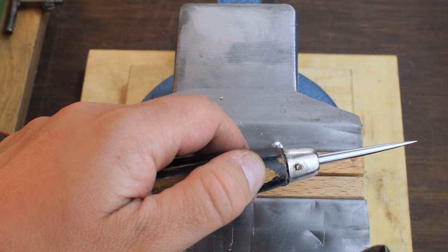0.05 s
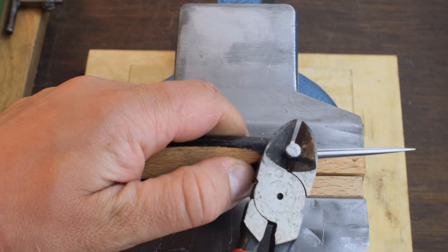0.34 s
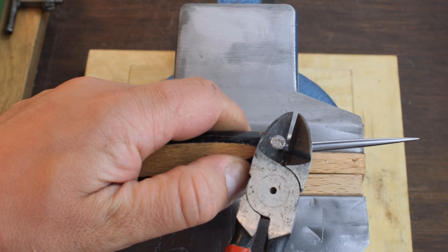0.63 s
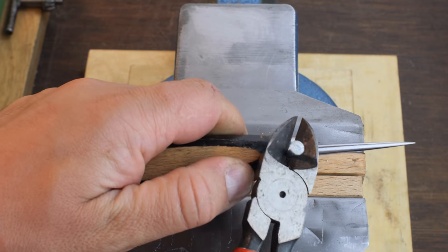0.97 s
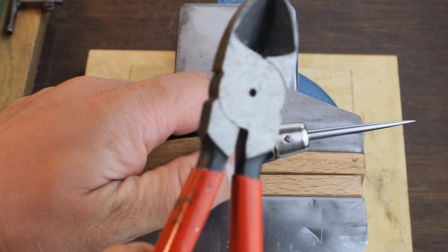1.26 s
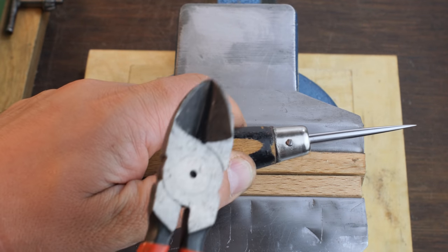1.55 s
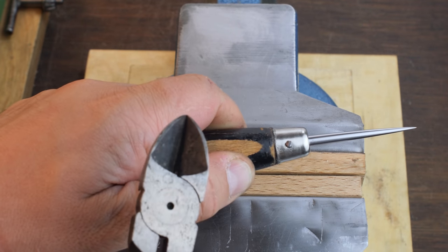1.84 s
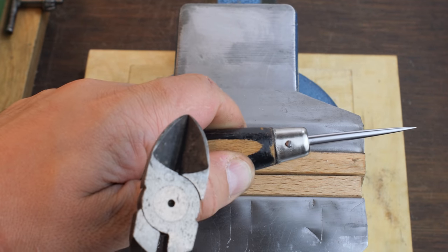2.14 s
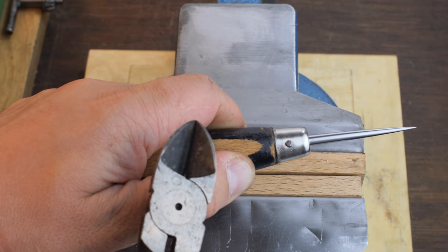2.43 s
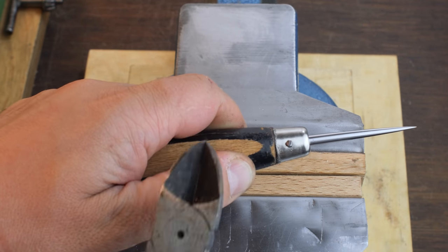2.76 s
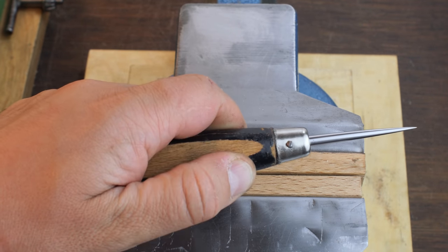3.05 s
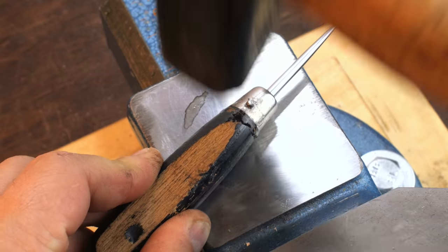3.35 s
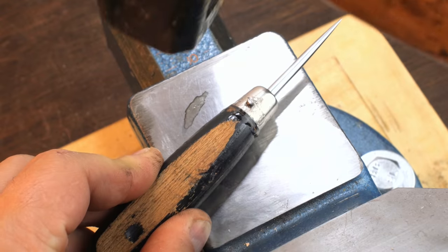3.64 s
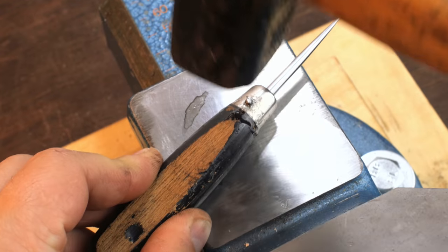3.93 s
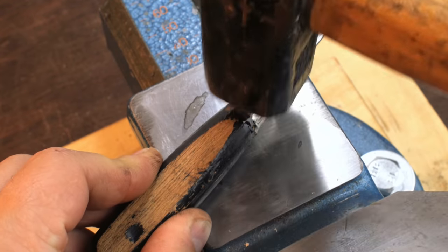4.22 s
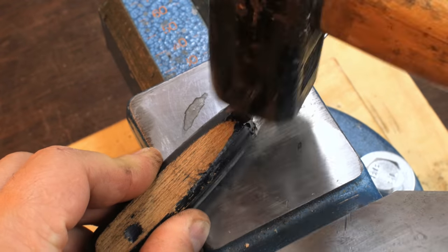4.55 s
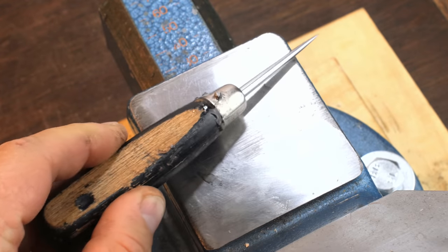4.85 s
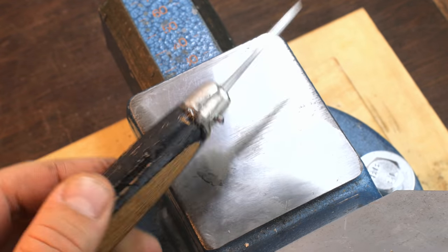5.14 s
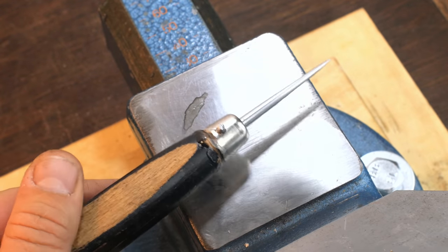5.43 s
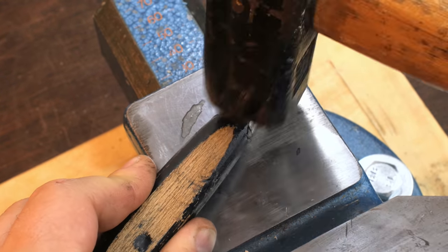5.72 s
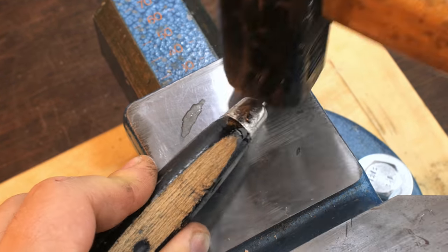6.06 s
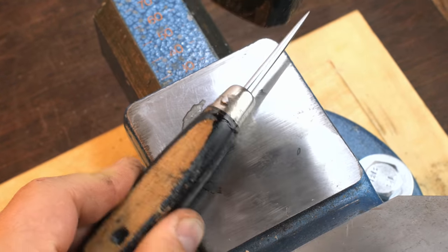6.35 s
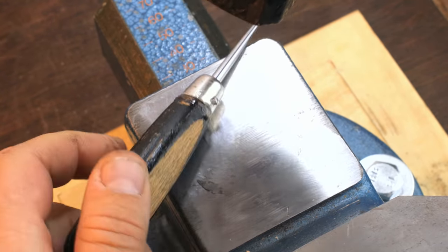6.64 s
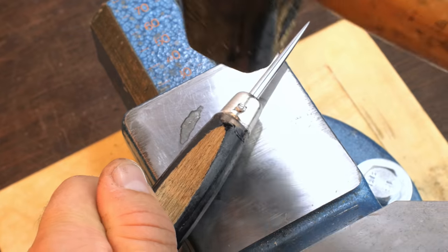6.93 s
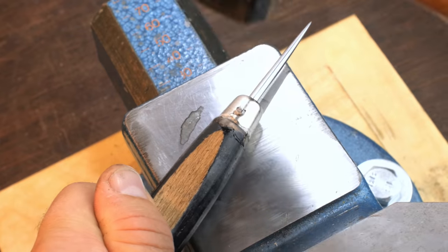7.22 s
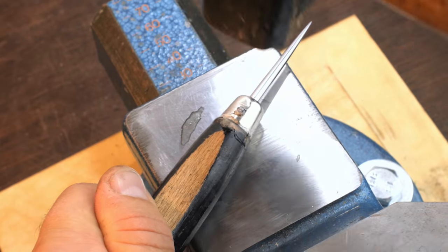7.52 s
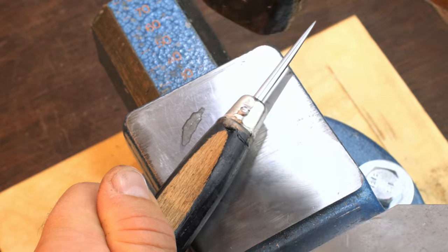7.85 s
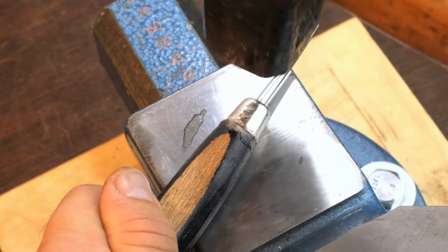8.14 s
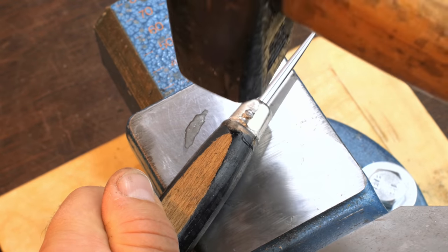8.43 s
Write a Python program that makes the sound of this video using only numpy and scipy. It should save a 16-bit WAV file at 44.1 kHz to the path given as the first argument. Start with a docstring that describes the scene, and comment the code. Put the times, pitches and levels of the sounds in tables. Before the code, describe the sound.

Cutters snip a metal pin, the scrap bounces away, then a hammer taps steel on a vise in short runs with pauses.

```python
"""A hammer peens a steel pin in an awl's ferrule on the anvil of a bench vise, heard from close by.
At each blow the steel ticks, the handle knocks, the bench thuds; loose vise parts chatter after most.
First, side cutters snip the pin and the off-cut lands across the workshop. Between runs of blows the
awl is turned over and clinks on the anvil, and low rumble swells. The stereo microphone pair is on a
camera at the bench: its stand sways with the blows and its limiter holds them down."""
import sys
import numpy as np
from scipy import signal
from scipy.fft import rfft, irfft
from scipy.io import wavfile
from scipy.ndimage import uniform_filter1d, minimum_filter1d

SR = 44100
rng = np.random.default_rng(int(sys.argv[2]) if len(sys.argv) > 2 else 0)


def int16_out(signal):
    """Quantize to a 16-bit WAV file."""
    q = np.round(np.clip(np.atleast_2d(signal).T, -1, 1) * 32767)
    wavfile.write(sys.argv[1], SR, q.astype(np.int16))


N = 378378
T = np.arange(2 * SR // 5) / SR  # time axis of one hit
OFFCUT_HZ = 15050

# still workshop air: (frequency [Hz], level [dB])
AIR_COLOUR = [(12, -38.5), (20, 5.5), (55, -7.5), (98, -4), (168, -5.5), (248, -3), (399, -15.5),
              (434, -13), (499, -19), (558, -19), (897, -23.5), (1260, -24), (5230, -33), (14700, -35.5),
              (16000, -38.5)]
# tool and handle knock in the fingers: (time [s], level [dB], pitch [Hz])
HANDLING_KNOCKS = [(0.988, -61, 2300), (1.1936, -43, 1550), (1.2072, -42, 1380), (1.335, -56.5, 664),
                   (1.578, -58, 2764), (4.771, -62, 1837), (4.837, -63, 1414), (6.46, -63, 760),
                   (6.511, -53.5, 1320), (6.544, -50, 790), (6.71, -42.5, 2370), (6.817, -54, 1440)]
# modes of a held tool: (multiple of the pitch, level [dB], t60 [s])
HELD_MODES = [(1, 2.5, .02), (1.37, -6, 0.011), (1.9, -6, 0.0099)]
# tiny contacts of loose parts: (frequency [Hz], level [dB])
RATTLE_COLOUR = [(500, -16.5), (1900, -9), (2400, 8), (3000, -3), (3600, -5), (4200, -12), (5500, -7.5),
                 (7000, -12.5), (11000, -20.5), (14000, -36)]
# the cutters bite, snap through and settle: (time [s], level [dB])
SNIP_HITS = [(1.1156, -56), (1.1195, -25.5), (1.1213, -50), (1.2058, -50), (1.388, -71.5), (1.422, -66)]
# the pin breaking: (frequency [Hz], level [dB])
SNAP_COLOUR = [(300, -19), (850, -22), (1400, -2), (3000, -4.5), (4000, -3.5), (4900, 4), (6100, -3.5),
               (6900, -8), (12500, -11), (14000, -14.5), (15200, -18), (16000, -22.5)]
# cutter jaws: (frequency [Hz], level [dB], t60 [s])
JAW_MODES = [(1486, -14.5, 0.0087), (2344, -2, 0.021), (2840, -15.5, 0.034), (3500, -7.5, 0.019),
             (4650, 0, 0.02), (5280, -15, 0.024), (5860, -4, 0.027), (7560, -11.5, 0.023),
             (9170, -11.5, 0.0098), (10600, -22, 0.015), (12000, -13.5, 0.013)]
# low rumble swells between the blows: (time [s], level [dB])
RUMBLE_SWELLS = [(1.18, -42.5), (4.851, -41), (5.522, -35.5), (6.35, -40)]
# the stand under the microphones: (frequency [Hz], level [dB])
STAND_MODES = [(24, -12.5), (30.5, 3.5), (55, -19), (79, -12)]
# the hand or the rocking vise jolts the bench: (time [s], level [dB], cutoff [Hz])
BENCH_JOLTS = [(1.1936, -33, 252), (1.2016, -28, 89), (1.207, -35.5, 400), (1.328, -41.5, 91),
               (1.363, -46.5, 47.7), (1.404, -60.5, 50.6), (1.505, -45, 66), (4.82, -50.5, 444),
               (5.593, -53, 397), (7.151, -32.5, 588), (7.185, -21, 203)]
# jolted bench top: (frequency [Hz], level [dB])
JOLT_COLOUR = [(20, -6.5), (50, 4.5), (120, 9.5), (200, -4), (310, 2.5), (500, -7), (1000, -2.5),
               (4000, -10)]
# vise on its board and bench: (frequency [Hz], level [dB], t60 [s])
BENCH_MODES = [(62.2, -25.5, 0.53), (84, -18.5, .14), (129.3, -7, 0.1), (161.3, -18.5, .42),
               (200, -16, 0.041), (224.7, -18.5, 0.087), (290, -7, 0.04), (301.3, -2.5, 0.055),
               (344, -7, 0.08), (405, -10, 0.1), (436, -10, 0.076), (516, -5.5, 0.042), (612, -8, 0.032),
               (687, -7.5, 0.05)]
# the off-cut bounces across the room: (time [s], level [dB], ring pitch [Hz], ring level [dB])
BOUNCES = [(1.677, -50.5, 690, -54.5), (1.689, -63, 946, -50), (1.9274, -23.5, 870, -43),
           (1.9387, -46.5, 1204, -34), (2.009, -47.5, 1130, -64), (2.085, -46, 1260, -59)]
# clack of its landing: (frequency [Hz], level [dB])
BOUNCE_COLOUR = [(100, -24), (380, -5), (680, -20.5), (880, 0.5), (1400, -5), (2300, -4), (5200, -8.5),
                 (7000, -11), (9500, -14.5), (12500, -22.5), (14200, -30), (15100, -31), (16000, -24.5)]
# fingers slide along the handle: (fastest moment [s], length [s], level [dB])
FINGER_SLIDES = [(3.33, 0.066, -66), (3.43, 0.11, -66.5), (3.86, 0.087, -66), (4.26, 0.035, -65),
                 (4.94, 0.11, -67.5), (5.14, 0.11, -59.5), (5.25, 0.36, -72), (6.62, 0.16, -78.5),
                 (7.04, 0.3, -55), (7.38, 0.19, -61.5), (8.4, 0.3, -75)]
# skin on wood: (frequency [Hz], level [dB])
SKIN_COLOUR = [(200, -12), (500, 2), (1500, -1.5), (3000, -6), (6000, -6), (10000, -4), (14000, -19.5),
               (16000, -16)]
# hammer blows: (time [s], tick [dB], tick pitch [Hz], crack [dB], knock [dB], thud [dB], sway [dB])
HAMMER_BLOWS = [(3.4905, -32, 5350, -35.5, -40.5, -36, -33), (3.9086, -31, 5170, -34.5, -38.5, -35, -32),
                (4.2812, -29.5, 5420, -33.5, -38.5, -34.5, -30),
                (4.634, -33.5, 5210, -37.5, -41.5, -39.5, -35), (5.8087, -30, 5270, -30, -40, -37, -29),
                (6.1144, -28, 4960, -36, -45.5, -44, -31), (6.873, -53.5, 5340, -19.5, -26.5, -23, -21),
                (7.1478, -34, 5130, -32.5, -32.5, -24, -15.5),
                (7.4593, -30, 5020, -34.5, -42.5, -36, -31.5), (7.758, -30.5, 5190, -35, -38.5, -34, -31.5),
                (8.0452, -52.5, 4940, -29, -35.5, -31, -28.5)]
# ferrule and pin: (multiple of the tick pitch, level [dB], t60 [s])
FERRULE_MODES = [(1, 9.5, 0.0052), (1.08, -29.5, 0.018), (1.73, 2, 0.0028), (2.06, 5, .003),
                 (2.32, -15.5, .003)]
# crack of steel on steel: (frequency [Hz], level [dB])
CRACK_COLOUR = [(300, -26), (1400, 4.5), (2400, -3), (3800, -0.5), (5800, -9), (7300, -7.5), (11500, -6.5),
                (13000, -14), (16000, -26.5)]
# loose steel of the vise: (frequency [Hz], level [dB], t60 [s])
VISE_MODES = [(2325, 0, .08), (2420, -2, .07), (2600, -5, .05), (2762, -3, .07), (2900, -5, .06),
              (3210, -7, .04), (3375, -7, .06), (3522, -1, .11), (4258, -9, .05), (4743, -6, .07),
              (5572, -11, .08)]
# wooden handle and hammer head: (frequency [Hz], level [dB], t60 [s])
HANDLE_MODES = [(770, -6, .014), (864, -3, .016), (1130, -9, .012), (1270, 0, .014), (1526, -3, .013),
                (1755, -9, .014)]
# dull boom of the bench top under a blow: (frequency [Hz], level [dB])
BOOM_COLOUR = [(40, -11.5), (80, -4), (140, -1), (220, -11), (300, 4.5), (370, -9.5), (600, -10),
               (1200, -26), (4000, -45.5)]
# loose vise parts fall back: (time [s], level [dB])
VISE_FALLS = [(3.513, -41), (3.962, -47.5), (4.304, -44.5), (4.689, -50.5), (5.861, -44), (6.915, -25),
              (7.182, -27), (7.212, -37.5), (7.792, -46), (8.089, -35.5)]
# the awl touches the anvil: (time [s], level [dB])
AWL_TOUCHES = [(5.594, -64.5), (6.511, -69), (6.543, -67), (6.653, -45), (6.66, -47.5), (6.671, -51),
               (6.682, -44.5), (6.699, -47.5), (6.709, -43), (6.819, -48.5), (6.833, -38), (6.838, -45.5)]
# the awl's ferrule and spike: (frequency [Hz], level [dB], t60 [s])
AWL_MODES = [(1400, -22.5, .03), (2440, -23, 0.046), (4740, -11.5, 0.029), (5360, 0, 0.0072),
             (5750, -2.5, 0.032), (5800, -18.5, .12), (7040, -13, .02), (8040, -7, .02), (8700, -3.5, .03),
             (11900, -14.5, .02), (12700, -10, 0.02)]
# ferrule scraping the anvil: (frequency [Hz], level [dB])
SCRAPE_COLOUR = [(500, -7), (2300, -9.5), (3700, -9), (4800, 2.5), (5700, 13), (6500, -16.5), (8400, 0),
                 (9500, -11.5), (13000, -21.5), (16000, -25)]
# decay of the workshop: (frequency [Hz], t60 [s])
WORKSHOP_T60 = [(80, 1), (200, 0.29), (500, .32), (1500, 0.26), (5000, 0.27), (10000, 0.24), (16000, 0.28)]
# its reflections at the microphones: (frequency [Hz], level [dB])
WORKSHOP_COLOUR = [(60, -1), (200, -1), (500, -5.5), (1200, -5.5), (2800, -8), (5000, -8), (8000, -7),
                   (11500, -12), (15000, -17.5)]


def amp(db):
    """Decibels to gain."""
    return 10 ** (np.asarray(db) / 20)


def read(points, hz):
    """A curve's value, joined on a log-frequency axis."""
    f, value = np.transpose(points)
    return np.interp(np.log(hz + 1), np.log(f), value)


def unit(x):
    """Scales a hit to the energy of 20 ms at level 1."""
    return x * np.sqrt(SR / 50 / np.sum(x ** 2))


def add(mix, s, sound):
    """Mixes a sound in at time s."""
    part = mix[round(s * SR):][:len(sound)]
    part += sound[:len(part)]


def tint(x, colour):
    """Filters a sound by the given spectrum."""
    size = x.shape[-1]
    return irfft(rfft(x) * amp(read(colour, np.fft.rfftfreq(size, 1 / SR))), size)


def noise(colour, size):
    """Steady noise of level 1 with the given spectrum."""
    x = tint(rng.standard_normal(size), colour)
    return x / x.std()


def burst(colour, t60):
    """Countless dense modes dying together."""
    return unit(noise(colour, len(T)) * amp(-60 * T / t60))


def ring(modes, scale=1, vary_db=0):
    """Decaying modes of alternate sign; the spot that is struck shifts their balance."""
    shifts = vary_db * rng.standard_normal(len(modes))
    return unit(sum((-1) ** k * amp(db + shifts[k] - 60 * T / t60) * np.sin(2 * np.pi * hz * scale * T)
                    for k, (hz, db, t60) in enumerate(modes)))


def pair(mid, side, side_db):
    """Left and right of a closely spaced microphone pair."""
    side = amp(side_db) * side
    return np.array([mid + side, mid - side]) / np.sqrt(1 + amp(side_db) ** 2)


def air(level_db):
    """The low, steady hush of the workshop, all around the microphones."""
    return amp(level_db) * pair(noise(AIR_COLOUR, N), noise(AIR_COLOUR, N), side_db=-2)


def handling(knock_db, click_db):
    """Light knocks of tool and handle, damped at once by the fingers."""
    out = np.zeros(N)
    attack = 1 - np.exp(-T / 0.002)
    for s, db, hz in HANDLING_KNOCKS:
        tone = ring(HELD_MODES, hz, vary_db=3)
        click = amp(click_db) * burst(RATTLE_COLOUR, t60=0.01)
        add(out, s, amp(db + knock_db) * (tone + click) * attack)
    return out


def cutters(snip_db, ring_db, zing_db):
    """The pin breaks with a dense crack, the jaws ring briefly and the freed scrap zings."""
    out = np.zeros(N)
    jaws = amp(ring_db) * ring(JAW_MODES)
    for s, db in SNIP_HITS:
        zing = ring([(OFFCUT_HZ * rng.uniform(.96, 1.03), 0, .16) for _ in range(6)])
        snap = burst(SNAP_COLOUR, t60=.014)
        add(out, s, amp(db + snip_db) * (snap + jaws + amp(zing_db) * zing))
    return out


def rumble(sway_db, right_db, lift_db, sway_s):
    """Each blow sways the stand, and low rumble also swells between blows; left and right mostly oppose."""
    t = np.arange(0, sway_s, 1 / SR)
    swell = np.sin(np.pi * t / sway_s)
    rock, lift = np.zeros((2, N))
    for s, *_, db in HAMMER_BLOWS + RUMBLE_SWELLS:
        for motion in (rock, lift):
            modes = sum(amp(level) * np.sin(2 * np.pi * (hz * rng.uniform(.92, 1.08) * t + rng.random()))
                        for hz, level in STAND_MODES)
            add(motion, s, amp(db + sway_db) * swell * modes)
    return np.array([rock, -amp(right_db) * rock]) + amp(lift_db) * lift


def jolts(bump_db, ring_db):
    """A push rings the bench top; the softer the contact, the less it holds above the bass."""
    out = np.zeros(N)
    for s, db, cutoff_hz in BENCH_JOLTS:
        boom = burst(JOLT_COLOUR, t60=0.12) + amp(ring_db) * ring(BENCH_MODES)
        push = signal.lfilter(*signal.butter(2, cutoff_hz, fs=SR), boom)
        add(out, s, amp(db + bump_db) * unit(push))
    return out


def offcut(zing_db):
    """Across the room the scrap clacks on a hard surface that rings briefly, and itself zings high."""
    out = np.zeros(N)
    for s, db, hz, ring_db in BOUNCES:
        clack = amp(db) * burst(BOUNCE_COLOUR, t60=0.12)
        surface = amp(ring_db) * ring([(hz, 0, .05), (hz * 1.3, -3, .04)])
        zing = ring([(OFFCUT_HZ * rng.uniform(.98, 1.02), 0, .2) for _ in range(6)])
        add(out, s, clack + surface + amp(zing_db + 0.12 * db) * zing)
    return out


def fingers(rub_db, side_db, rise_share):
    """Skin hisses on wood, swelling as each slide speeds up and fading as it slows."""
    t = np.arange(N) / SR
    power = np.zeros(N)
    for s, length, db in FINGER_SLIDES:
        width = length * np.where(t < s, rise_share, 1 - rise_share)
        power += amp(db) ** 2 * np.exp(-((t - s) / width) ** 2)
    return amp(rub_db) * np.sqrt(power) * pair(noise(SKIN_COLOUR, N), noise(SKIN_COLOUR, N), side_db)


def ferrule(tick_db):
    """Steel meets steel: a short, bright tick, spread by a second touch as the ferrule meets the anvil."""
    out = np.zeros(N)
    for s, tick, hz, *_ in HAMMER_BLOWS:
        add(out, s, amp(tick + tick_db) * ring(FERRULE_MODES, hz, vary_db=3))
        add(out, s + 0.00062, amp(tick + tick_db - 17) * burst(CRACK_COLOUR, t60=0.019))
    return out


def hammer(crack_db, knock_db, thud_db, boom_db, vise_db):
    """Each blow cracks and rings handle, vise and bench; the handle's pitch shifts with the grip."""
    out = np.zeros(N)
    for s, _, _, crack, knock, thud, _ in HAMMER_BLOWS:
        steel = ring(VISE_MODES, vary_db=2.5)
        wood = ring(HANDLE_MODES, rng.uniform(.93, 1.07), vary_db=2)
        add(out, s, amp(crack + crack_db) * burst(CRACK_COLOUR, t60=0.048))
        add(out, s, amp(crack + vise_db) * steel)
        add(out, s, amp(knock + knock_db) * wood)
        add(out, s, amp(thud + boom_db) * burst(BOOM_COLOUR, t60=0.14))
        bench = ring(BENCH_MODES, rng.uniform(.97, 1.03), vary_db=2)
        add(out, s + 0.00049, amp(thud + thud_db) * bench)
    return out


def chatter(rattle_db, ring_db):
    """Loose steel falls back in a flurry of tiny contacts, each of which detunes its ring a little."""
    out = np.zeros(N)
    for s, db in VISE_FALLS:
        flurry = unit(burst(RATTLE_COLOUR, t60=0.031) * (1 - np.exp(-T / .008)))
        add(out, s - .005, amp(db + rattle_db) * flurry)
        for delay in (0, .004, .009):
            steel = ring(VISE_MODES, rng.uniform(.985, 1.015), vary_db=2)
            add(out, s + delay, amp(db + ring_db) * steel)
    return out


def awl(clink_db, scrape_db):
    """The ferrule skips over the anvil: a thin ring and a short scrape at each touch."""
    out = np.zeros(N)
    for s, db in AWL_TOUCHES:
        scrape = unit(burst(SCRAPE_COLOUR, t60=0.033) * (1 - np.exp(-T / .0006)))
        clink = ring(AWL_MODES, rng.uniform(.98, 1.02), vary_db=2)
        add(out, s, amp(db + clink_db) * (clink + amp(scrape_db) * scrape))
    return out


def direct(x, side_db):
    """Bench top and hand scatter the direct sound a little differently to each microphone."""
    scatter = rng.standard_normal(130) * np.hanning(130)
    return pair(x, signal.oaconvolve(x, scatter / np.linalg.norm(scatter))[:N], side_db)


def room(x, side_db):
    """Dense reflections off bench and walls, each band dying at its own speed."""
    taps = rng.standard_normal((2, len(T))) * (rng.random((2, len(T))) < .15)
    hz, t, bands = signal.stft(taps, SR, nperseg=256)
    t60 = read(WORKSHOP_T60, hz)[:, None]
    bands = bands * 1e-3 ** (t / t60) / np.sqrt(t60)
    onset = np.clip((T - .001) / 0.0015, 0, 1)
    tail = signal.istft(bands, SR, nperseg=256)[1][:, :len(T)] * onset
    tail /= np.linalg.norm(tail, axis=1, keepdims=True)
    tail = tint(tail, WORKSHOP_COLOUR) * (1 - T / T[-1]) ** .5
    return signal.fftconvolve(x[None], pair(*tail, side_db), axes=1)[:, :N]


def limiter(x, ceiling_db, hold_s, recover_db_per_s):
    """Turns down at once on a peak, holds, then recovers."""
    power_db = 10 * np.log10(abs(uniform_filter1d((x ** 2).mean(0), size=88)) + 1e-12)
    span = 2 * int(hold_s * SR / 2) + 1
    over_db = np.maximum(power_db - ceiling_db, 0)
    held_db = -minimum_filter1d(-over_db, span, origin=span // 2)
    recovery = np.arange(N) / SR * recover_db_per_s
    cut_db = np.maximum.accumulate(held_db + recovery) - recovery
    return x / amp(uniform_filter1d(cut_db, size=24))


def scene():
    """From the bench: tools close to the microphones, the far off-cut mostly room, over still air."""
    tick = ferrule(tick_db=7)
    peening = hammer(crack_db=3.0, knock_db=9.0, thud_db=7.5, boom_db=4.5, vise_db=-1.5)
    peening += chatter(rattle_db=3.0, ring_db=-4.5)
    tools = cutters(snip_db=1.5, ring_db=-8.0, zing_db=-21.0)
    tools += awl(clink_db=-7.5, scrape_db=5.5) + handling(knock_db=-3.5, click_db=-1.5)
    bumps = jolts(bump_db=1.0, ring_db=-9)
    far = offcut(zing_db=-50.0)
    mix = direct(tick + peening + tools + bumps, side_db=-11.0)
    mix += direct(far, side_db=-9) * amp([[-7.0], [-4.0]])  # a little to the right
    # the anvil face throws the tick at the microphones more than into the room
    into_room = amp(-6.5) * tick + amp(2.5) * peening + amp(1.5) * tools + amp(-13.5) * bumps
    mix += room(into_room, side_db=-6.5) + amp(-2.0) * room(far, side_db=-6.5)
    mix += air(level_db=-63.58) + fingers(rub_db=-1.0, side_db=-5.5, rise_share=0.47)
    return mix + rumble(sway_db=-0.5, right_db=-4.5, lift_db=-15.5, sway_s=0.44)


def record(dry):
    """Behind the microphones: the camera's limiter, rounded peaks and a band limit."""
    held = limiter(dry, ceiling_db=-19.0, hold_s=0.19, recover_db_per_s=63)
    rounded = held / (1 + (held / .24) ** 6) ** (1 / 6)
    lowpass = signal.firwin(511, cutoff=16200, window=("kaiser", 9), fs=SR)
    return signal.oaconvolve(rounded, lowpass[None], "same")


dry = scene()
out = record(dry)
int16_out(out)
```